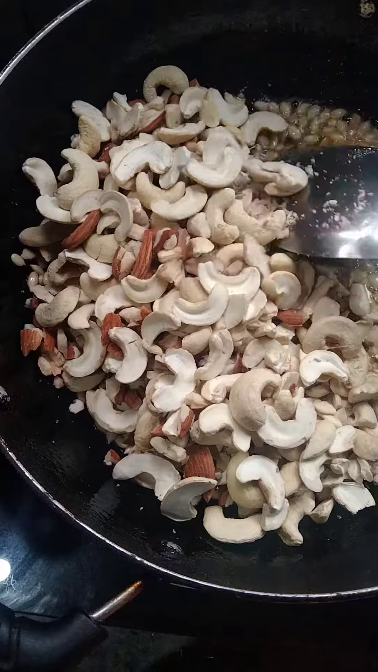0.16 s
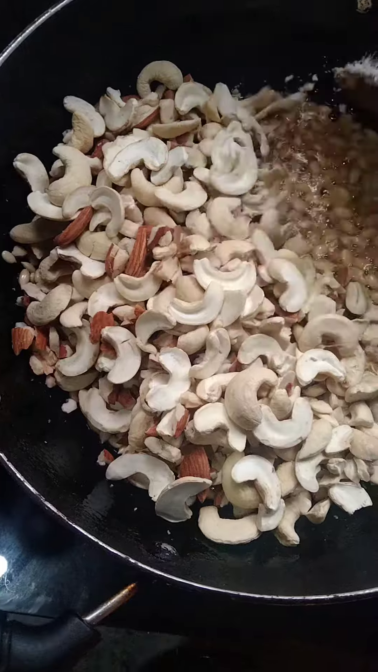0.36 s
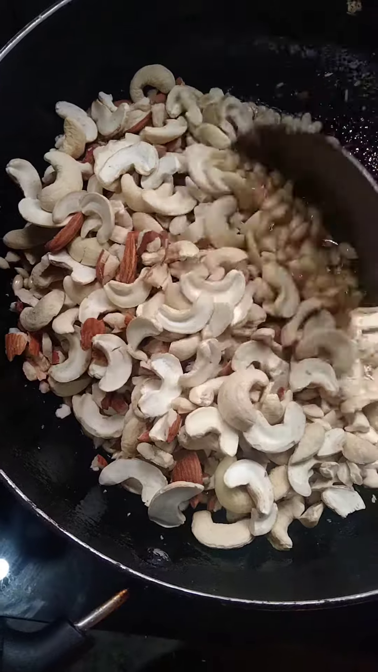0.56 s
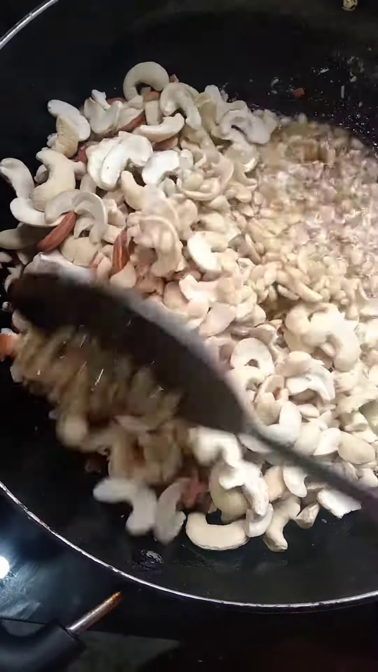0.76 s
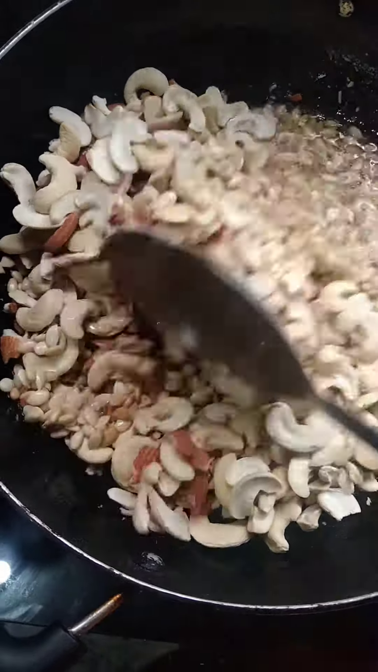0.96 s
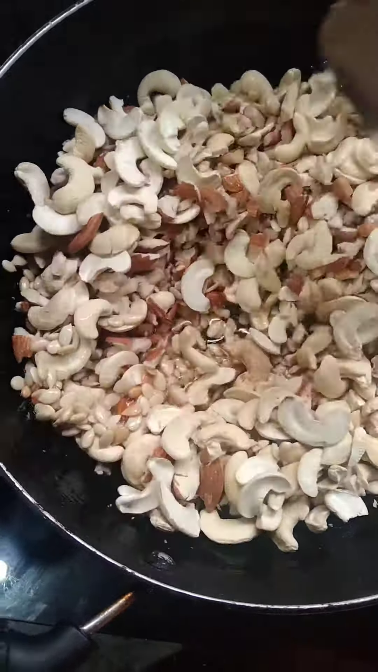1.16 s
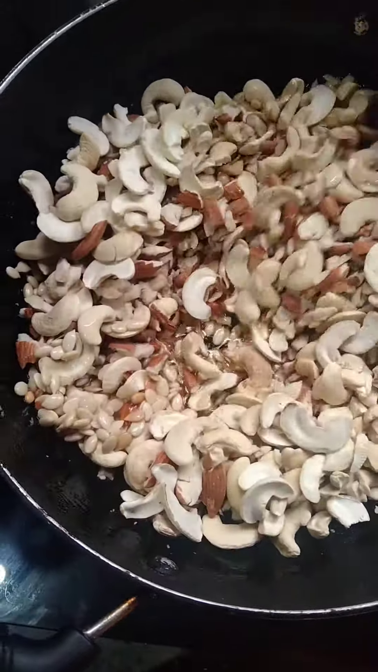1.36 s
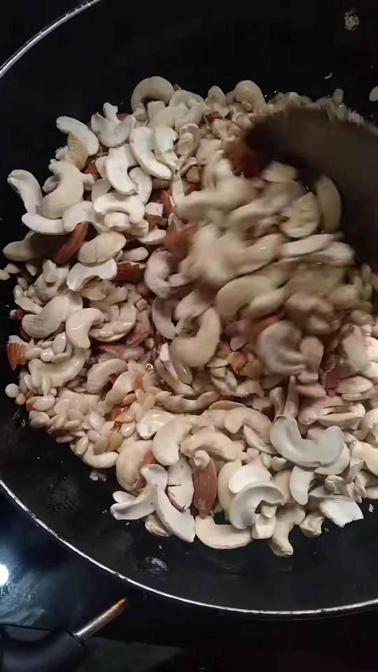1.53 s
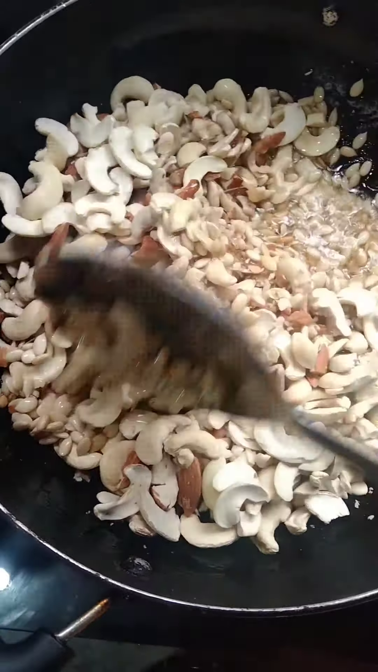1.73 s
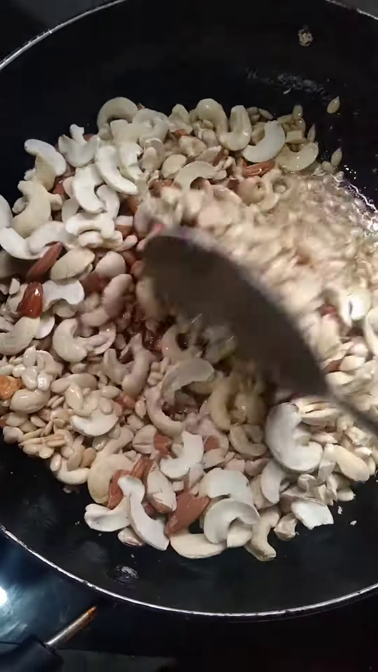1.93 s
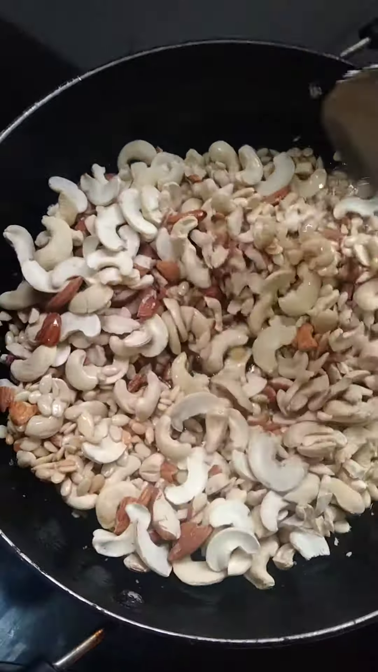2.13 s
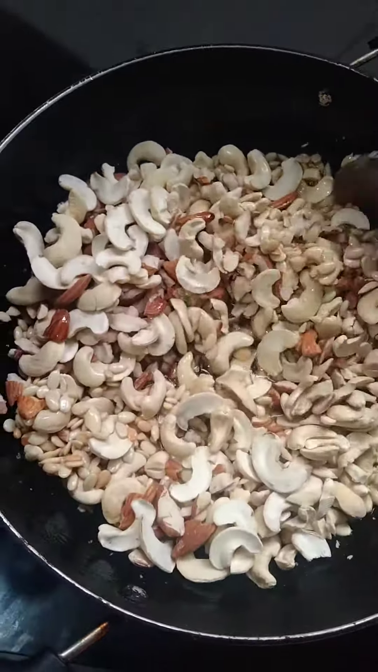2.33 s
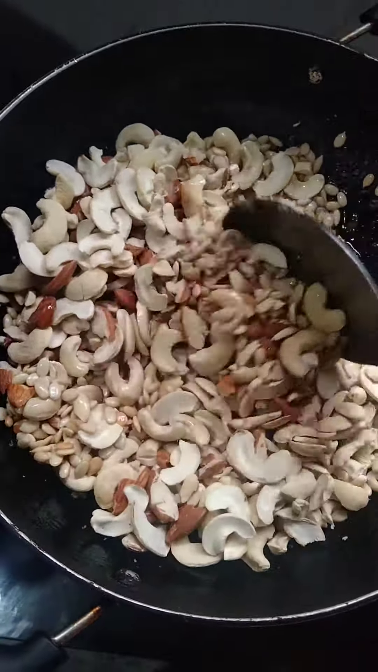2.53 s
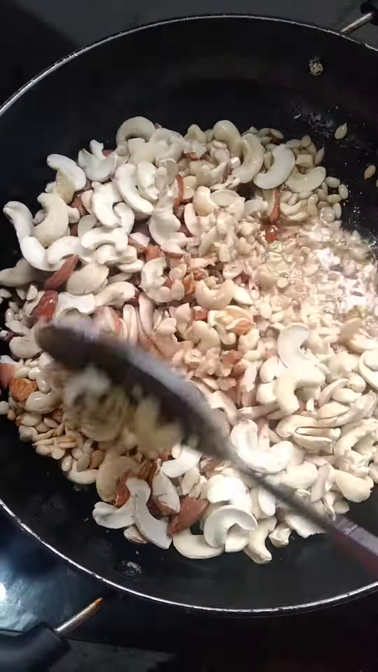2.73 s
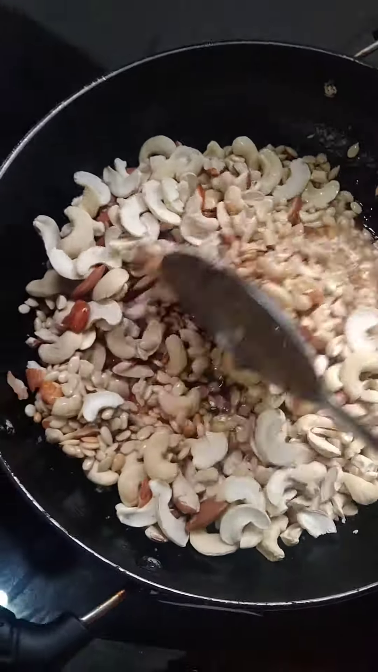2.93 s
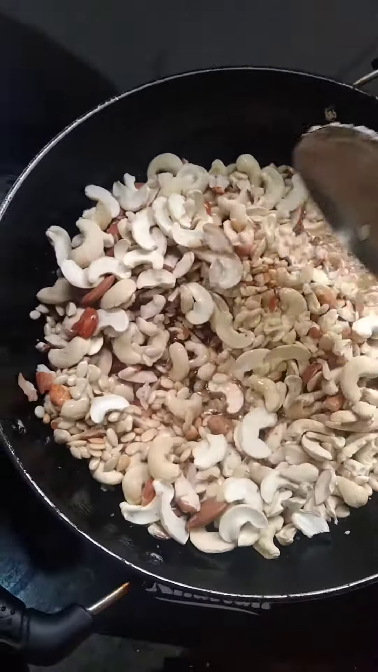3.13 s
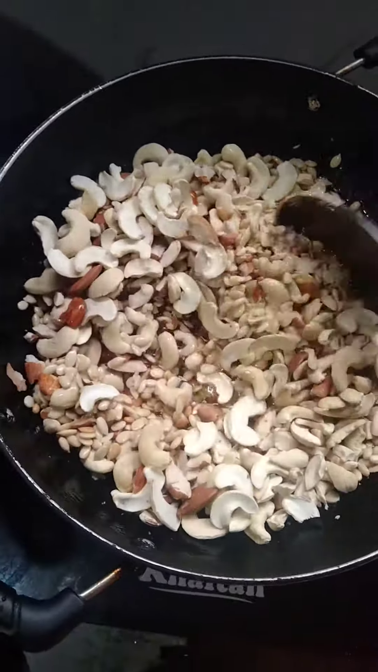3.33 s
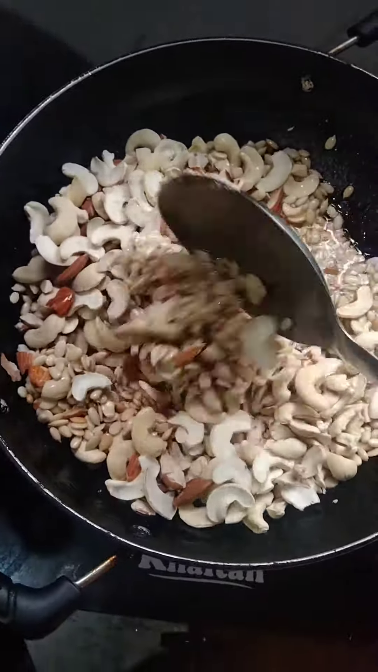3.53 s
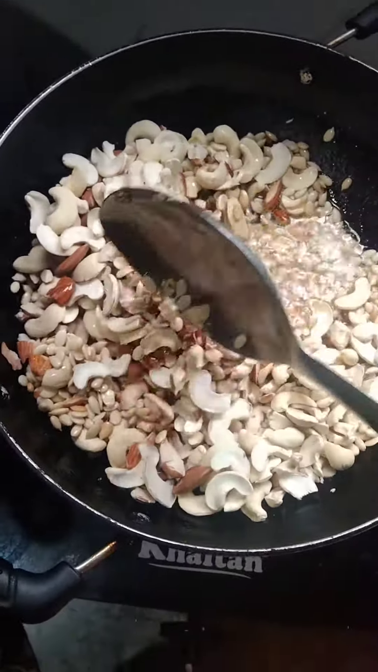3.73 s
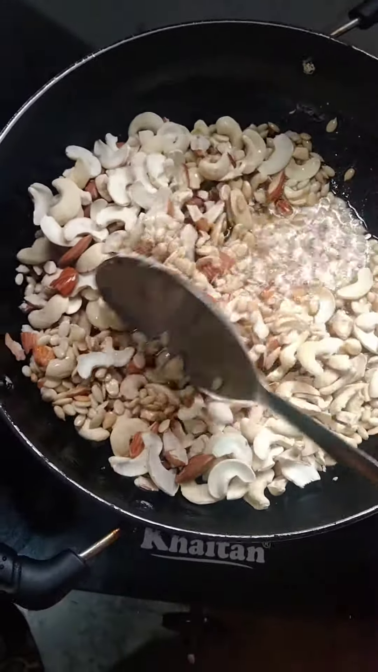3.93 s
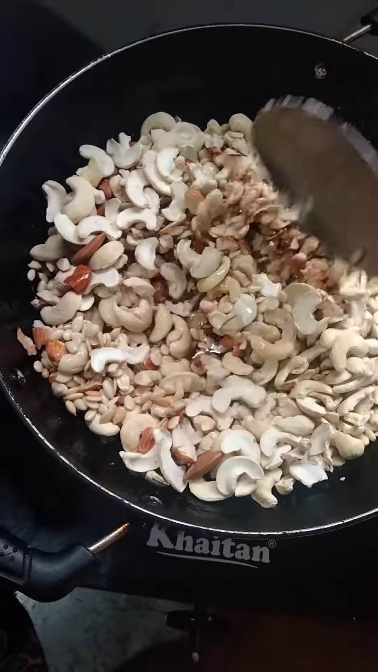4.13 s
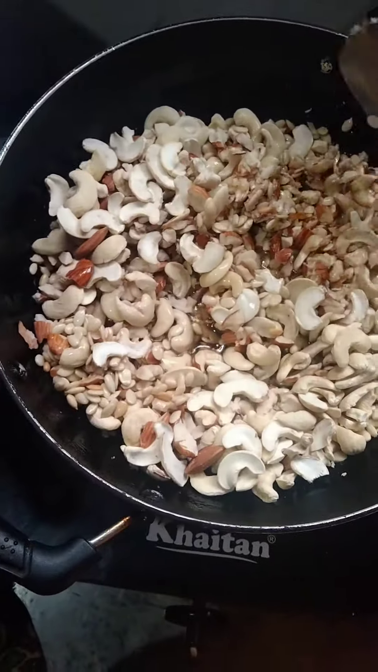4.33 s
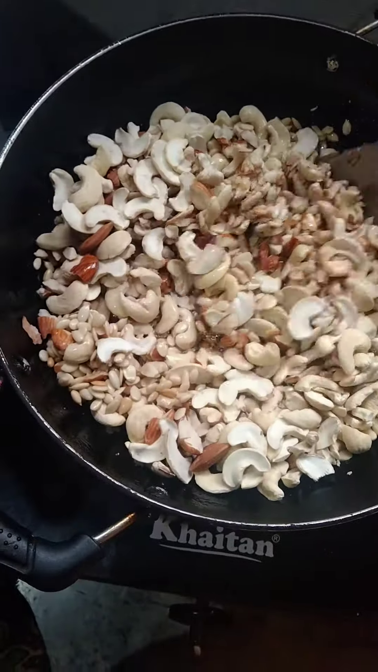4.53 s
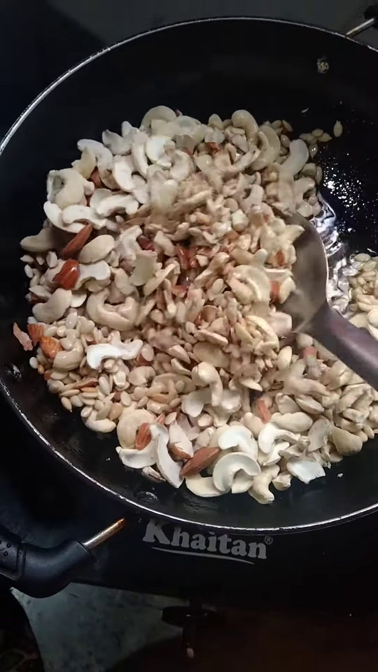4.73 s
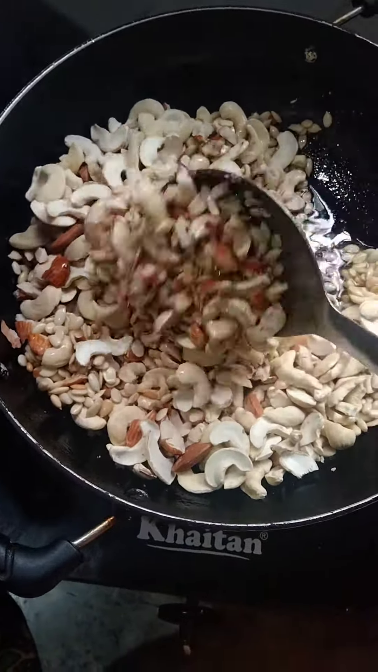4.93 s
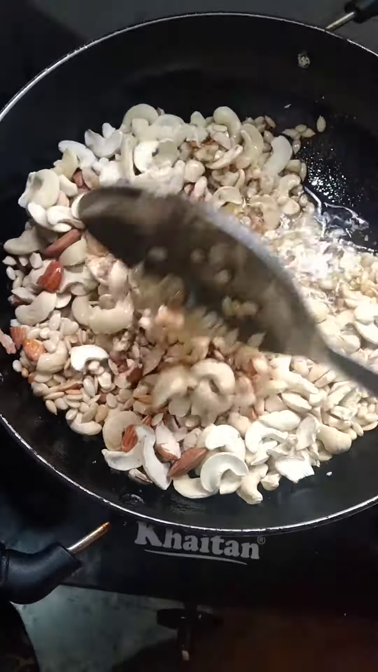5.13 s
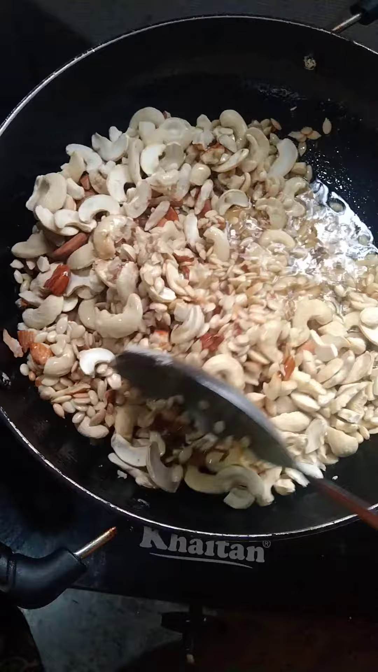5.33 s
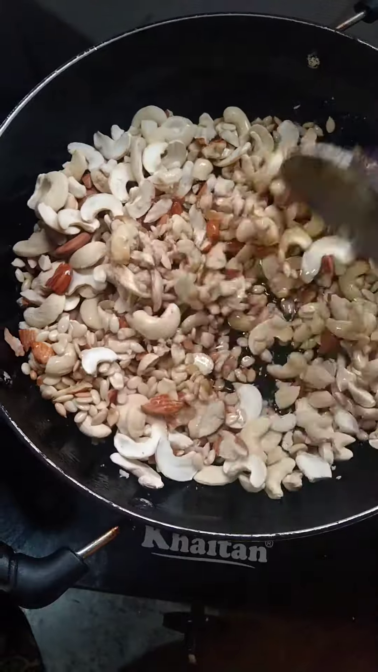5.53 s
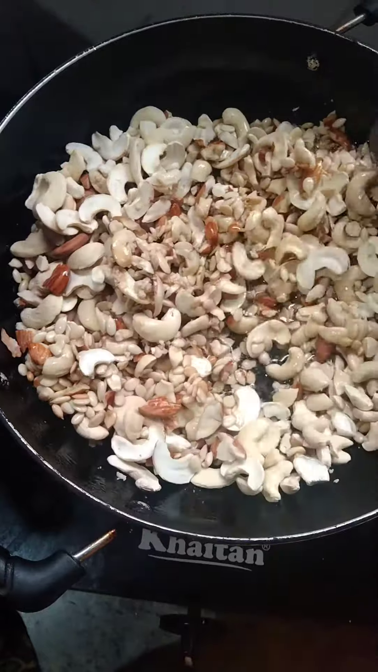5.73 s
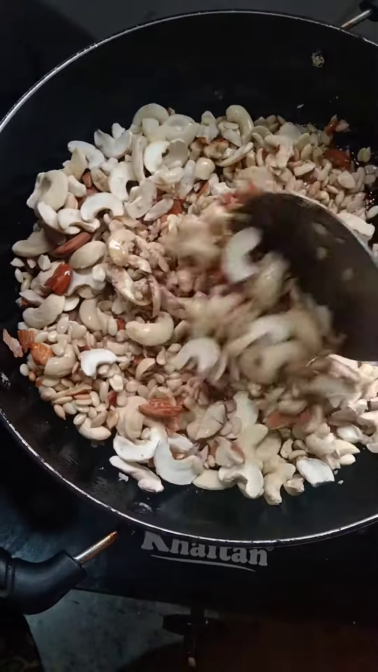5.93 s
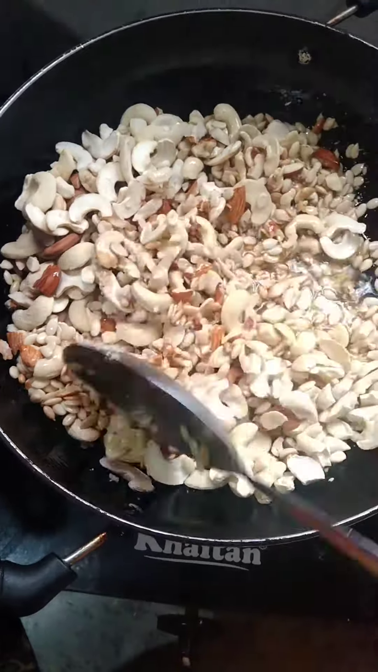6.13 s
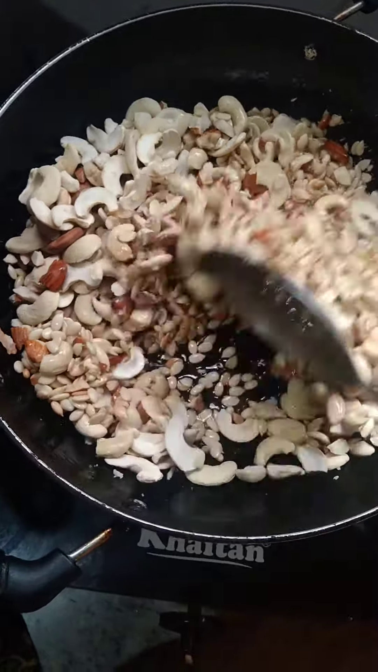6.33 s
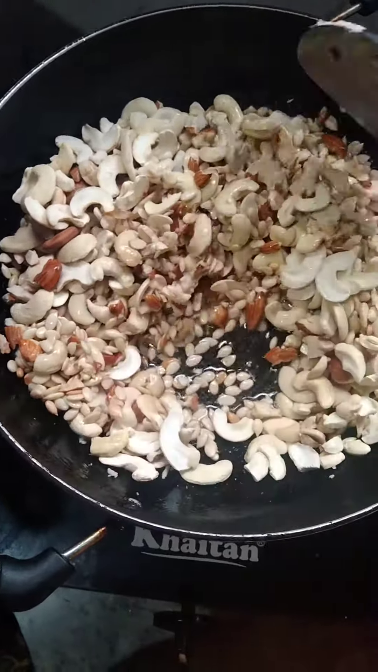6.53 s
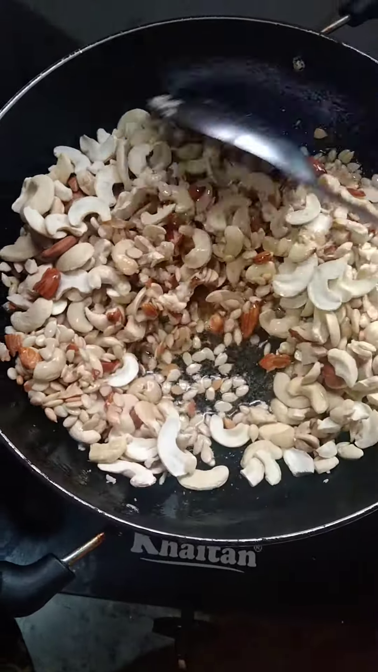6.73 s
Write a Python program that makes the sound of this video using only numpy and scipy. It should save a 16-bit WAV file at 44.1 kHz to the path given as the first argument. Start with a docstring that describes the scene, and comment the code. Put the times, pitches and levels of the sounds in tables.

```python
"""A metal spatula turns dry nuts in a pan on an electric hob, close by in a kitchen.
The blade clinks and scrapes: each contact cracks and sets off fading tones in the pan and blade.
The pan booms softly under each push (filtered noise); nuts and crumbs tick as short filtered bursts.
The hob's cooling fan and mains hum run throughout, made of steady tones and coloured noise."""
import sys
import numpy as np
from scipy import signal
from scipy.fft import rfft, irfft
from scipy.io import wavfile
from scipy.ndimage import map_coordinates

SR = 44100
rng = np.random.default_rng(int(sys.argv[2]) if len(sys.argv) > 2 else 0)


def persist_wave(psi):
    """Save psi, clipped to +-1, as 16-bit WAV."""
    counts = np.round(np.clip(psi, -1, 1) * 32767).astype(np.int16)
    wavfile.write(sys.argv[1], SR, np.atleast_2d(counts).T)


N = 302967
TIME = np.arange(N) / SR
BLOW = np.arange(SR // 6) / SR  # time since a contact, in s

# All levels in the tables are relative: each source sets its own volume.
FAN_HZ = 22.89  # turns of the fan shaft per second
# tones of the fan: multiple of the shaft speed, level_db
FAN_TONES = [(9, -55.5), (15, -58), (18, -60), (24, -55), (27, -52), (28, -53), (30, -59), (31, -57),
             (33, -52), (34, -54), (36, -59), (37, -59), (52, -60), (57, -56), (58, -55), (60, -55),
             (61, -59), (63, -56), (64, -55), (66, -59), (88, -60), (91, -61)]
# mains hum and other steady tones of the hob: pitch_hz, level_db
HUM_TONES = [(100, -54), (122.9, -51), (200.1, -60), (300.0, -58), (400.3, -62), (500.1, -61), (547.6, -56),
             (600.1, -61), (648.7, -61), (677.2, -59), (707.5, -57), (747.2, -51), (748.6, -51), (818, -60)]
# rush of the fan's air: frequency_hz, level_db (per Hz)
AIR_COLOUR = [(45, -33), (65, -10), (110, -2), (160, -0.5), (235, -4), (380, -2.5), (750, 3.5), (1050, 0.5),
              (1350, 3.5), (1800, -2), (2150, -1.5), (3000, -12.2), (4300, -22), (5500, -53),
              (16000, -58.5)]
# the microphone draws back from the fan's air: time_s, level_db
AIR_LEVEL = [(2, 1), (3, -0.5)]
# the spatula strikes: start_s, pan_ring_db, crack_db, blade_ring_db, crack_pitch_hz,
# favoured_blade_pitch_hz, top_of_blade_ring_db
STRIKE_EVENTS = [(0.4642, -23, -34, -36.5, 2450, 6740, 12), (0.483, -34, -42, -67, 2300, 6800, -1),
                 (0.883, -52, -50, -61, 3680, 6400, 15), (0.927, -49, -42.5, -57, 3000, 6500, -7),
                 (0.948, -55, -50, -62, 3400, 7000, -1), (0.994, -58, -46, -53.5, 2980, 7650, -31),
                 (1.407, -52, -46.5, -47.5, 2880, 6600, -2), (1.518, -56, -60, -62.5, 4400, 6520, -22.5),
                 (1.861, -47, -43.5, -55.5, 3100, 6500, -12), (2.410, -34.5, -35, -80, 1095, 6510, -20),
                 (2.431, -43, -52, -84, 3640, 6650, -14), (2.588, -36.5, -46.5, -57.5, 2670, 6330, -20),
                 (3.452, -39, -37, -88, 1047, 6460, -21), (4.491, -32.5, -40.5, -55.5, 2980, 6000, -7),
                 (4.596, -41.5, -49.5, -55.5, 1982, 7883, 2), (5.401, -45, -51, -65, 2704, 8030, 7),
                 (5.44, -51, -56, -63, 3000, 6300, -9), (5.529, -56, -45.5, -56.5, 2970, 5870, -4),
                 (6.193, -60, -50.5, -63.5, 2500, 6440, -2), (6.237, -39, -42, -57.5, 3300, 6480, 12),
                 (6.423, -60, -46.5, -62, 2700, 6520, 2), (6.742, -34.5, -48.5, -65.5, 4190, 6500, 16),
                 (6.817, -50, -58, -65, 2387, 8100, 3)]
# the edge drags over the pan: start_s, length_s, pan_ring_db, blade_ring_db, crumb_crunch_db
SCRAPE_EVENTS = [(0.473, 0.034, -34.5, -66, -46), (0.527, 0.069, -37.5, -70, -53),
                 (0.571, 0.062, -41.5, -47, -36.5), (0.9, 0.063, -53, -55, -42),
                 (0.997, .13, -57, -67, -50.5), (1.429, 0.14, -63.5, -66, -56),
                 (1.584, 0.045, -42, -75, -42.5), (1.908, 0.19, -52.5, -61, -48.5),
                 (2.418, 0.053, -43, -74, -57), (4.5, 0.11, -46, -61, -51),
                 (4.595, 0.079, -42.5, -50, -37.5), (4.664, .12, -46, -60.5, -49),
                 (5.371, 0.2, -52, -62.5, -50.5), (5.902, 0.13, -50, -66.5, -49),
                 (6.24, 0.1, -46.5, -65, -53), (6.426, 0.081, -46.5, -63, -61),
                 (6.739, 0.095, -54.5, -63, -51.5)]
FIRM_DB = -50  # table level of the blade ring in a firm scrape
# the favoured blade pitch falls as the contact slides along the edge
SLIDE_FROM_HZ, SLIDE_TO_HZ = 8000, 6300
# thin squeaks of the edge: start_s, pitch_hz, level_db
SQUEAK_EVENTS = [(2.042, 14500, -66.5), (5.748, 12650, -72)]
# the loudest nuts snap against the metal: start_s, level_db, pitch_hz
TICK_EVENTS = [(0.241, -39, 2500), (0.602, -29, 2700), (0.621, -33, 3300), (0.842, -39, 2910),
               (0.91, -39, 2900), (1.039, -40, 3000), (1.142, -35.5, 2880), (1.364, -43, 3000),
               (1.667, -33, 3326), (1.914, -39, 3020), (1.936, -37.5, 3100), (2.023, -42, 4200),
               (2.413, -40, 2420), (2.042, -37, 3100), (2.54, -40.5, 3200), (2.798, -41.5, 3670),
               (2.853, -39, 3220), (3.061, -37, 3080), (3.171, -37.5, 3300), (3.455, -39, 2720),
               (4.631, -29.5, 2900), (4.657, -32.5, 3000), (4.693, -39, 3397), (4.726, -41, 4250),
               (4.764, -42, 4000), (5.007, -40, 3550), (5.376, -37, 2600), (5.465, -39, 3195),
               (5.559, -39.5, 2930), (5.99, -34, 2600), (6.54, -43, 3070), (6.648, -42, 3040),
               (6.709, -39.5, 3470), (6.735, -42, 4400), (6.768, -49, 4200)]
# the spatula shoves the heap: middle_s, length_s, pan_boom_db, nut_rustle_db
PUSH_EVENTS = [(0.528, 0.27, -36.5, -71), (1.148, 0.22, -50, -64), (1.638, 0.19, -36, -77),
               (1.949, 0.19, -42.5, -70), (2.454, 0.14, -43, -71.5), (2.603, 0.15, -36.5, -65),
               (3.07, 0.24, -51, -68), (3.518, 0.19, -38, -78.5), (4.06, 0.16, -52, -69),
               (4.56, 0.11, -36.5, -64), (4.755, 0.14, -42, -73.5), (5.419, 0.13, -35, -62.5),
               (6.034, 0.32, -37, -66), (6.281, 0.13, -35, -63), (6.516, 0.12, -38, -83),
               (6.823, 0.25, -41, -73)]
RESTING_DB = -55  # boom between pushes, on the same scale as pan_boom_db
# the nuts tumble after each push, then settle
TUMBLE_LAG_S, TUMBLE_RISE_S, SETTLE_DB_PER_S = 0.027, 0.042, 40
# middle pitch of nut snaps and crumb cracks, and how widely single ones differ (on a log scale)
SNAP_HZ, SNAP_SCATTER = 3000, 0.28
CRUNCH_HZ, CRUNCH_SCATTER = 2500, 0.24
# one soft low bump: start_s, level_db, pitch_hz
BUMP = (5.381, -43, 55)
# ringing tones (modes) of the pan: pitch_hz, level_db, time to fade by 60 dB (t60_s)
PAN_MODES = [(280, -10, 0.18), (353.6, -5, 0.16), (408, -5.5, 0.17), (466, -7, 0.12), (633, -1.5, 0.05),
             (780, -4.5, 0.13), (825, -3, 0.054), (940, -2.5, 0.12), (1210, -9, 0.057), (1317, 4.5, 0.068),
             (1700, -11.5, 0.036), (1964, -8.5, 0.093), (2220, -12, 0.045), (2600, -8, 0.036)]
# modes of the blade: pitch_hz, level_db, t60_s
BLADE_MODES = [(5814, -4, 0.028), (6420, 1, 0.056), (6830, 2.5, 0.046), (7320, -10.5, 0.089),
               (7650, -6, 0.093), (8170, -16.5, 0.13), (10090, -18, 0.09), (10850, -18, 0.061),
               (11570, -17.5, 0.063), (12920, -15, 0.037), (13550, -15.5, .04)]
# modes of the blade's rim: pitch_hz, level_db, t60_s
RIM_MODES = [(2680, 7, 0.04), (4200, -9.5, 0.038)]
# crowd of short-lived modes between the pan's main ones: frequency_hz, level_db (per Hz)
PAN_CLATTER = [(150, -30.5), (270, 0), (420, 3.5), (650, 1.5), (1200, 1), (1700, -2.5), (2400, -8.5),
               (3200, -23), (4600, -31.5), (6000, -57)]
# the same crowd in the blade: frequency_hz, level_db (per Hz)
BLADE_ZING = [(3000, -13), (4500, 11), (5400, -5.5), (6700, 5.5), (7900, -0.5), (9000, -14.5), (13000, -16),
              (15500, -19)]
# colour of a dry contact: frequency_hz, level_db (per Hz)
CRACK_COLOUR = [(300, -13), (1500, 16.5), (2700, 9.5), (3600, 2), (4500, 2), (5400, -6.5), (7000, -31),
                (9000, -57)]
# colour of nuts rubbing together: frequency_hz, level_db (per Hz)
RUB_COLOUR = [(1000, -10.5), (2800, 10.5), (4300, 4.5), (5300, -13), (7500, -21.5), (8600, -29.5),
              (15000, -40.5)]
# colour of steel rasping on the pan: frequency_hz, level_db (per Hz)
RASP_COLOUR = [(3000, -5), (4500, 2.5), (5400, -3.5), (8000, 7.5), (9500, -15.5), (15500, -10)]
# how long the kitchen's echo lasts: frequency_hz, t60_s
ROOM_DECAY = [(100, 0.52), (4000, 0.59), (7500, 0.4), (11000, 0.35), (15000, 0.61)]
# the sound fades in: time_s, level_db
FADE_LEVEL = [(.155, -80), (.168, -15.5), (.22, -3), (.3, 1), (.4, 3.5)]
EDGE_HZ = 15650  # top of the sound


def amp(db):
    """Turns decibels into a plain multiplier."""
    return 10 ** (np.asarray(db) / 20)


def unit(x):
    """Scales a sound to rms (average strength) 1."""
    return x / np.sqrt(np.mean(x ** 2) + 1e-20)


def unit_attack(x):
    """Scales a blow to rms 1 over its first fiftieth of a second."""
    return x / np.sqrt(np.mean(x[:SR // 50] ** 2) + 1e-20)


def read(points, hz):
    """Reads a table over frequency, joined on a log axis."""
    f, value = np.transpose(points)
    return np.interp(np.log(hz + 1), np.log(f + 1), value)


def add(mix, s, sound):
    """Adds a sound to the mix at time s, cut off at the end of the mix."""
    part = mix[round(s * SR):][:len(sound)]
    part += sound[:len(part)]


def curve(points):
    """Reads a table of time and level as a multiplier at every moment."""
    return amp(np.interp(TIME, *np.transpose(points)))


def coloured(x, points):
    """Makes some frequencies of x stronger than others, then sets rms 1."""
    gain = amp(read(points, np.fft.rfftfreq(len(x), 1 / SR)))
    return unit(irfft(rfft(x) * gain, len(x)))


def drift(rate_hz):
    """Slow random wandering, rms 1."""
    knots = rng.standard_normal(int(N / SR * rate_hz * 2) + 4)
    return unit(map_coordinates(knots, [TIME * rate_hz * 2], order=2, mode="nearest"))


def resonate(x, hz, width_hz):
    """One resonance: keeps mostly what lies near one pitch."""
    return signal.lfilter(*signal.iirpeak(min(hz, SR / 2 - 1), hz / width_hz, SR), x)


def resonate_twice(x, hz, width_hz):
    """Two equal resonances in a row pick out the pitch more sharply."""
    return resonate(resonate(x, hz, width_hz), hz, width_hz)


def ring(modes, spread_db, detune=0):
    """A struck body: each contact weights its modes anew, and the nuts on it may shift them a little."""
    hz, db, t60 = np.transpose(modes)[:, :, None]
    weight, shift = rng.standard_normal((2, *hz.shape))
    turns = hz * (1 + detune * shift) * BLOW + rng.random(hz.shape)
    fading = np.exp(-np.log(1000) * BLOW / t60)
    return (amp(db + spread_db * weight) * fading * np.sin(2 * np.pi * turns)).sum(0)


def grains(size, per_s, spread_db):
    """A train of tiny impacts of very uneven size, at random moments."""
    sizes = amp(spread_db * np.minimum(rng.exponential(1, size), 4))
    return sizes * rng.choice([-1, 1], size) * (rng.random(size) < per_s / SR)


def onset(rise_s):
    """The force of a contact builds over a short time."""
    return (1 - np.exp(-BLOW / rise_s)) ** 2


def burst(colour, decay_s):
    """Many close modes dying together, made from coloured noise."""
    return unit_attack(coloured(rng.standard_normal(len(BLOW)), colour) * np.exp(-BLOW / decay_s))


def shell(x, hz, width_hz, overtone=1.58, overtone_db=-3):
    """A hard contact speaks at one pitch and at an overtone."""
    return resonate(x, hz, width_hz) + amp(overtone_db) * resonate(x, overtone * hz, width_hz)


def snap(colour, hz, decay_s, width_hz, rise_s=0.00033):
    """The short dry snap of a nut or crumb, peak 1."""
    sound = shell(burst(colour, decay_s) * onset(rise_s), hz, width_hz)
    return sound / abs(sound).max()


def muffled(x, hz):
    """Nuts between blade and pan soften the top of a contact."""
    return signal.lfilter(*signal.butter(2, min(hz, SR / 2 - 1), fs=SR), x)


def force(pan_db):
    """How heavy a contact is, 0-1, judged by its pan level in the table."""
    return np.clip((pan_db + 32) / 7, 0, 1)


def skid(heavy, length_s=.007):
    """A light touch chatters along the metal for a moment; a heavy one lands at once."""
    size = int(length_s * SR)
    touches = grains(size, SR / 10, 3) * signal.windows.tukey(size, .5)
    touches *= (1 - heavy) / (np.linalg.norm(touches) + 1e-20)
    touches[0] += heavy
    return touches


def pan_ring(heavy, clatter_db=0, decay_s=0.0051, rise_s=0.00036, deep_db=8, deep_hz=410, deep_width_hz=170):
    """The pan, damped by its nuts; only a heavy contact flexes the whole bowl, with a hard first swing."""
    body = unit_attack(ring(PAN_MODES, 1.4)) + amp(clatter_db) * burst(PAN_CLATTER, decay_s)
    body = body * onset(rise_s * (1 - 0.89 * heavy))
    body = signal.lfilter(*signal.butter(2, 110, "high", fs=SR), body)
    flex = heavy * amp(deep_db) * resonate(body, deep_hz, deep_width_hz)
    first_swing = 1 + 1.6 * heavy * np.exp(-BLOW / .003)
    return unit_attack((body + flex) * first_swing)


def blade_ring(favoured_hz, top_db, favour_db=8, favour_width_hz=300, zing_db=-4, decay_s=0.0071,
               rise_s=0.00037):
    """Thin steel: the contact point favours modes near one pitch and sets how much the highest ring."""
    modes = []
    for hz, db, t60 in BLADE_MODES:
        nearness = np.exp(-((hz - favoured_hz) / favour_width_hz) ** 2)
        modes.append((hz, db + favour_db * nearness, t60))
    steel = unit_attack(ring(modes, 1.7, detune=0.012)) + amp(zing_db) * burst(BLADE_ZING, decay_s)
    lower = signal.lfilter(*signal.butter(4, 8800, "low", fs=SR), steel)
    upper = signal.lfilter(*signal.butter(4, 8800, "high", fs=SR), steel)
    return unit_attack((lower + amp(top_db) * upper) * onset(rise_s))


def kitchen(x, wet_db=-8):
    """Hard walls answer with a dense tail of echoes, each band dying at its own speed."""
    taps = rng.standard_normal(SR) * (np.arange(SR) > .006 * SR)  # silent for the first 6 ms
    hz, t, bands = signal.stft(taps, SR, nperseg=256)
    fading = np.exp(-np.log(1000) * t / read(ROOM_DECAY, hz)[:, None])
    tail = signal.istft(bands * fading, SR, nperseg=256)[1]
    return x + amp(wet_db) * signal.fftconvolve(x, tail / np.linalg.norm(tail))[:N]


def steady_tone(cycles):
    """A sine of rms 1 that starts at a random point of its swing."""
    return np.sqrt(2) * np.sin(2 * np.pi * (cycles + rng.random()))


def hob(fan_db=-3.0, hum_db=-3.5, air_db=-46.0, waver_db=0.2, chop=0.12, wobble=0.15, wander=0.00053):
    """Fan tones on a nearly steady shaft, air chopped by three blades and throbbing once a turn, and hum."""
    turns = np.cumsum(FAN_HZ * (1 + wander * drift(2.018))) / SR
    fan = sum(amp(db + waver_db * drift(2.7)) * steady_tone(order * turns) for order, db in FAN_TONES)
    hum = sum(amp(db) * steady_tone(hz * TIME) for hz, db in HUM_TONES)
    blade_turns = 3 * turns
    throb = 1 + chop * np.sin(2 * np.pi * blade_turns) + wobble * np.sin(2 * np.pi * turns)
    air = coloured(rng.standard_normal(N), AIR_COLOUR) * throb * curve(AIR_LEVEL)
    return amp(fan_db) * fan + amp(hum_db) * hum + amp(air_db) * air


def thump(decay_s=0.013):
    """One soft low bump with almost no ring: a sine that dies away fast."""
    s, db, hz = BUMP
    out = np.zeros(N)
    add(out, s, amp(db) * np.sin(2 * np.pi * hz * BLOW) * np.exp(-BLOW / decay_s))
    return out


def stirring(boom_hz=100.5, boom_width_hz=14, boom_db=-6.5):
    """Each push swells and ebbs, rocking the pan on its seat with a soft boom."""
    push = np.zeros(N)
    for middle, length, db, _ in PUSH_EVENTS:
        push += amp(db) * np.cos(np.pi * np.clip((TIME - middle) / length, -.5, .5))
    sway = signal.hilbert(resonate_twice(rng.standard_normal(N), boom_hz, boom_width_hz))
    boom = unit(sway.real / (abs(sway) + 1e-9) ** 0.24)  # steady pressure evens out the swing
    return resonate(amp(boom_db) * np.hypot(push, amp(RESTING_DB)) * boom, boom_hz, 45)


def tumbling():
    """How strongly the nuts move: every push stirs them up, and they settle slowly."""
    motion = np.zeros(N)
    for middle, _, _, db in PUSH_EVENTS:
        age = TIME - middle - TUMBLE_LAG_S
        rise = np.clip(1 + age / TUMBLE_RISE_S, 0, 1)
        motion = np.maximum(motion, rise * amp(db - SETTLE_DB_PER_S * np.maximum(age, 0)))
    return motion


def rustle(per_s=110, spread_db=3.0, width_hz=600, decay_s=0.0027, clump_db=3.5, still_db=-81, nuts_db=1,
           grazes_per_s=160, graze_db=-16, graze_width_hz=260, count=24):
    """Nuts tumble in clumps, clicking at many pitches; many brush the blade, which shimmers softly."""
    clicks = np.zeros(N)
    for hz in SNAP_HZ * np.exp(SNAP_SCATTER * rng.uniform(-0.81, 1, count)):
        hits = grains(N, per_s / count, spread_db)
        clicks += signal.oaconvolve(hits, snap(RUB_COLOUR, hz, decay_s, width_hz))[:N]
    pitches = [hz for hz, _, _ in BLADE_MODES if SLIDE_TO_HZ < hz < SLIDE_FROM_HZ]
    grazes = np.zeros(N)
    for hz in pitches:
        grazes += resonate_twice(grains(N, grazes_per_s / len(pitches), 1.7), hz, graze_width_hz)
    motion = (amp(still_db) + tumbling()) * amp(clump_db * drift(11))
    return motion * (amp(nuts_db) * unit(clicks) + amp(graze_db) * unit(grazes))


def ticks(tick_db=-1, decay_s=0.0018, width_hz=700, blade_db=-44, top_db=-18):
    """A nut gives one snap and makes the blade ring faintly."""
    out = np.zeros(N)
    for s, db, hz in TICK_EVENTS:
        add(out, s, amp(db + tick_db) * snap(RUB_COLOUR, hz, decay_s, width_hz))
        add(out, s, amp(db + blade_db) * blade_ring(2 * hz, top_db))
    return out


def crunch(crunch_db=-7.5, per_s=210, spread_db=4.5, decay_s=0.0033, width_hz=1300):
    """Crumbs crack one by one under the dragging edge, each with its own size and pitch."""
    out = np.zeros(N)
    for s, length, _, _, db in SCRAPE_EVENTS:
        cracks = np.zeros(int(length * SR) + len(BLOW))
        crumbs = max(int(per_s * length), 1)
        for k in range(crumbs):
            size, pitch = rng.standard_normal(2)
            along = (k + rng.random()) / crumbs  # 0-1 through the scrape
            level = amp(spread_db * size) * np.sin(np.pi * along) ** .5
            hz = CRUNCH_HZ * np.exp(CRUNCH_SCATTER * pitch)
            add(cracks, along * length, level * snap(CRACK_COLOUR, hz, decay_s, width_hz))
        add(out, s, amp(db + crunch_db) * cracks * np.sqrt(length * SR / np.sum(cracks ** 2)))
    return out


def clink(s=2.59, db=-42):
    """The rim of the blade catches the pan once and rings clear."""
    out = np.zeros(N)
    add(out, s, amp(db) * unit_attack(ring(RIM_MODES, 0) * onset(.001)))
    return out


def squeaks():
    """The edge squeaks thinly: noise squeezed to one high pitch, swelling and fading."""
    out = np.zeros(N)
    stroke = signal.windows.hann(SR // 30)
    for s, hz, db in SQUEAK_EVENTS:
        squeak = unit(resonate_twice(rng.standard_normal(len(stroke)), hz, 1600))
        add(out, s, amp(db) * squeak * stroke)
    return out


def scrapes(slips_per_s=1500, spread_db=3, pan_db=-1, blade_db=-8.0, rasp_db=-9.0, rasp_follow=2.4,
            lean_db=6, top_db=-5, count=4):
    """The edge sticks and slips; each place on it rings pan and blade anew, and leaning flexes the bowl."""
    out = np.zeros(N)
    for s, length, pan, blade, _ in SCRAPE_EVENTS:
        size = int(length * SR)
        slips = grains(size, slips_per_s, spread_db) * signal.windows.tukey(size, .5)
        # the contact moves through a few places, with blurred borders
        place = np.round(np.linspace(0, count - 1, size) + rng.uniform(-.5, .5, size))
        sounds = 0
        for k, hz in enumerate(np.linspace(SLIDE_FROM_HZ, SLIDE_TO_HZ, count)):
            bodies = np.array([pan_ring(force(pan + lean_db)), blade_ring(hz, top_db),
                               burst(RASP_COLOUR, 0.0007)])
            sounds = sounds + signal.fftconvolve((slips * (place == k))[None], bodies, axes=1)
        # the rasp grows faster than the blade ring
        rasp = FIRM_DB + rasp_follow * (blade - FIRM_DB)
        for sound, db in zip(sounds, (pan + pan_db, blade + blade_db, rasp + rasp_db)):
            add(out, s, amp(db) * sound * np.sqrt(size / (np.sum(sound ** 2) + 1e-20)))
    return out


def strikes(pan_db=-5.5, crack_db=-1, blade_db=0, crack_cycles=19, rise_cycles=1.7, crack_q=4.1,
            broad_db=-9, reach=2.7):
    """Each blow cracks and rings pan and blade; one cushioned by nuts is lower, slower and longer."""
    out = np.zeros(N)
    for s, pan, crack, blade, hz, blade_hz, top in STRIKE_EVENTS:
        contact = burst(CRACK_COLOUR, crack_cycles / hz) * onset(rise_cycles / hz)
        contact = muffled(contact, reach * hz)
        crack_sound = shell(contact, hz, hz / crack_q, overtone_db=-13) + amp(broad_db) * contact
        blade_sound = signal.fftconvolve(blade_ring(blade_hz, top), skid(force(pan)))
        add(out, s, amp(pan + pan_db) * pan_ring(force(pan)))
        add(out, s, amp(crack + crack_db) * unit_attack(crack_sound))
        add(out, s, amp(blade + blade_db) * unit_attack(blade_sound))
    return out


def scene():
    """Spatula and nuts echo in the kitchen, over the hob, the boom and the bump."""
    nuts = rustle() + ticks() + crunch()
    spatula = clink() + squeaks() + scrapes() + strikes()
    return (hob() + thump() + stirring() + kitchen(nuts + spatula))[None]


def record(dry):
    """A short fade in, then everything above the top edge is filtered away."""
    faded = dry * curve(FADE_LEVEL)
    low_pass = signal.firwin(511, EDGE_HZ, window=("kaiser", 9), fs=SR)
    return signal.oaconvolve(faded, low_pass[None], "same")


dry = scene()
out = record(dry)
persist_wave(out)
```